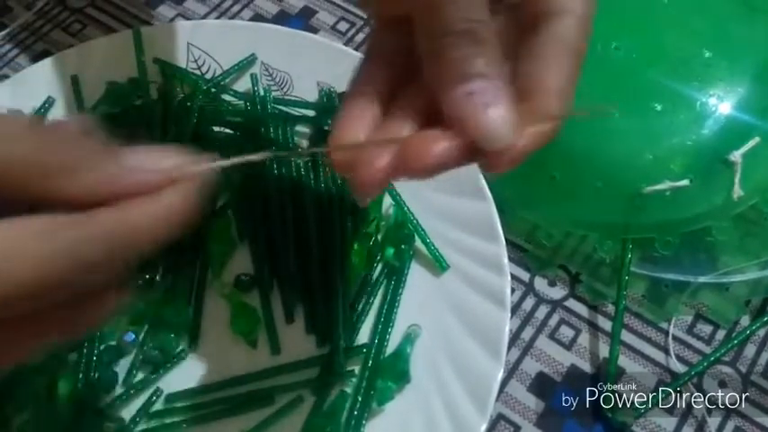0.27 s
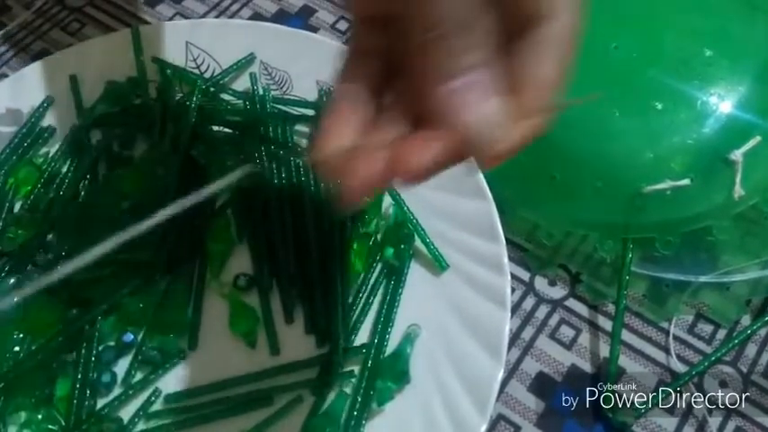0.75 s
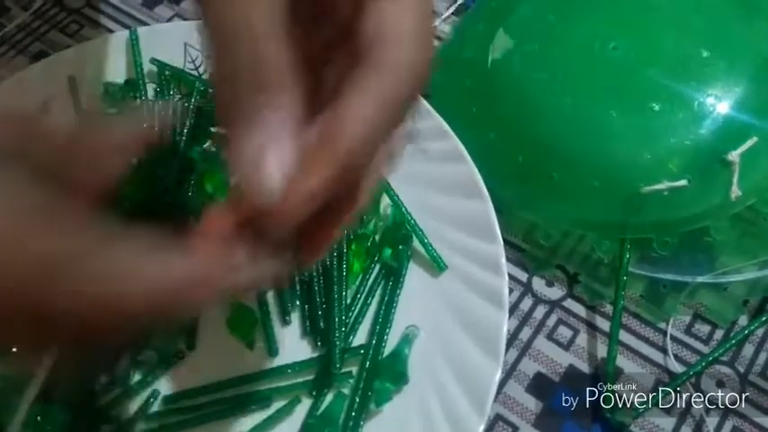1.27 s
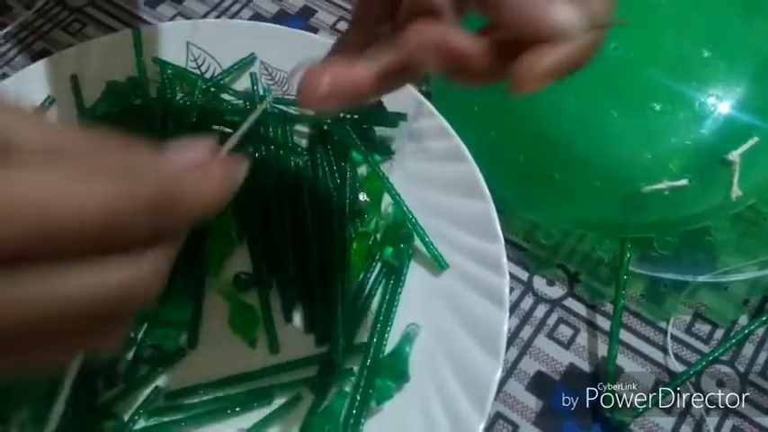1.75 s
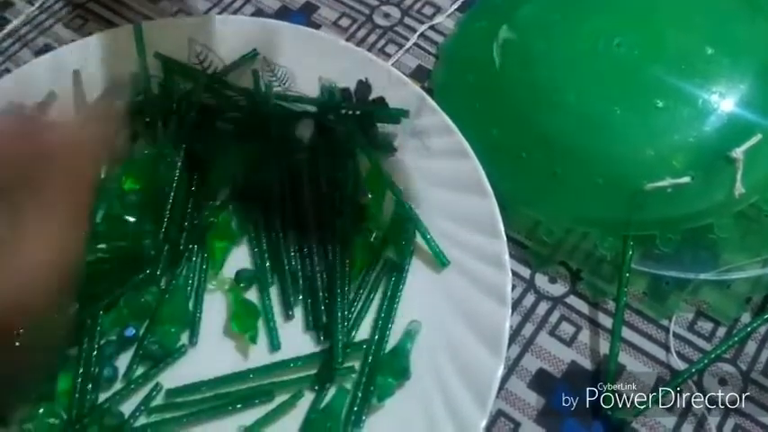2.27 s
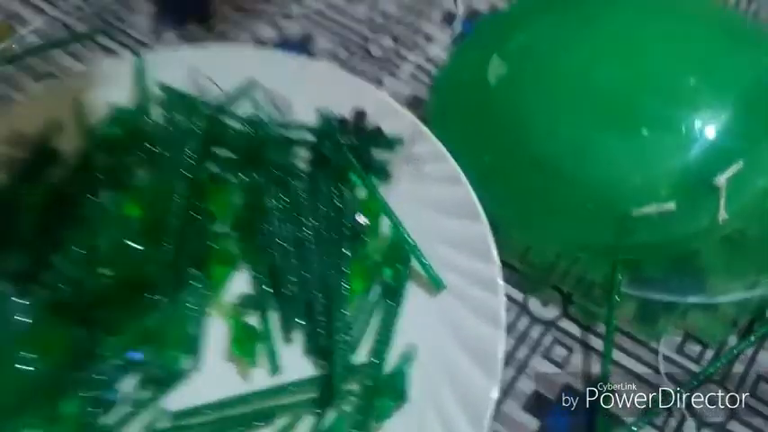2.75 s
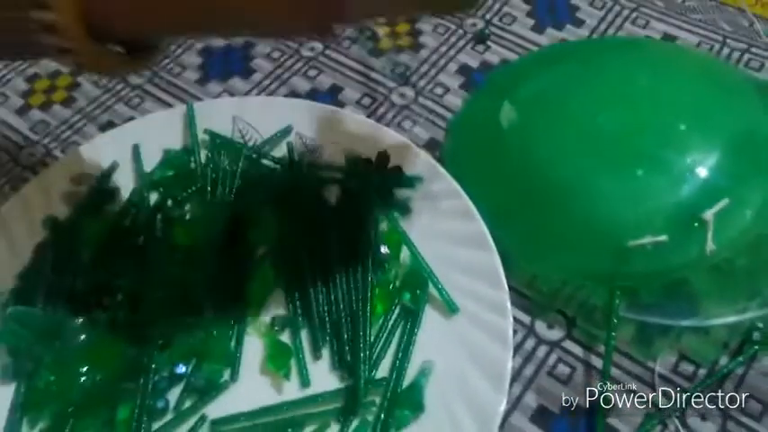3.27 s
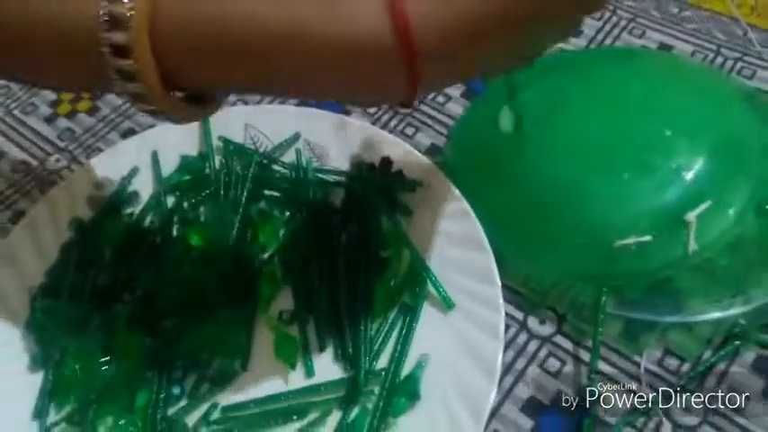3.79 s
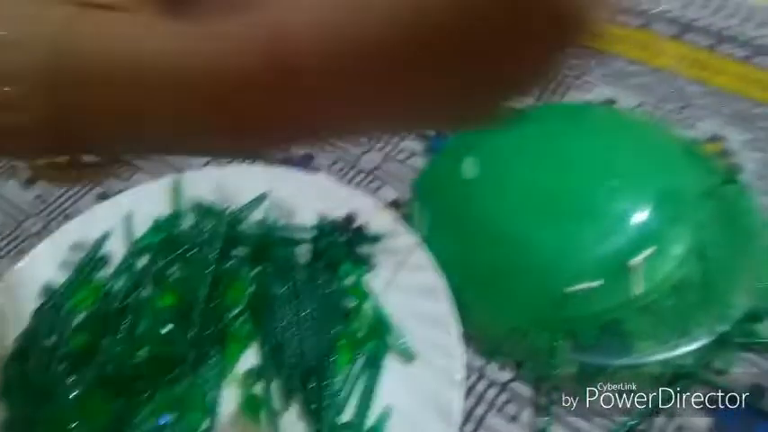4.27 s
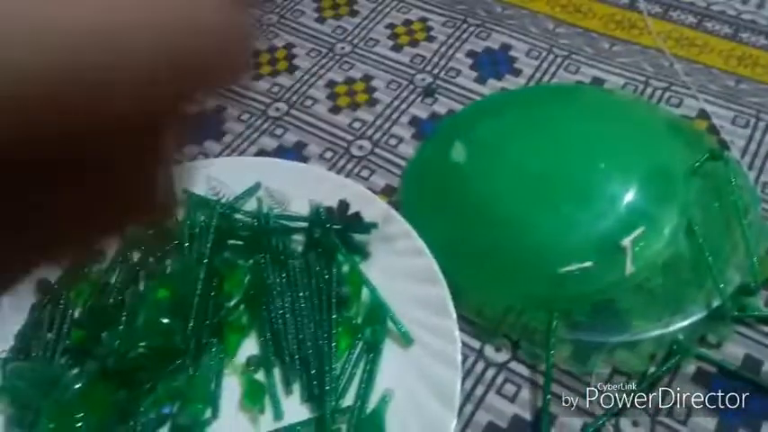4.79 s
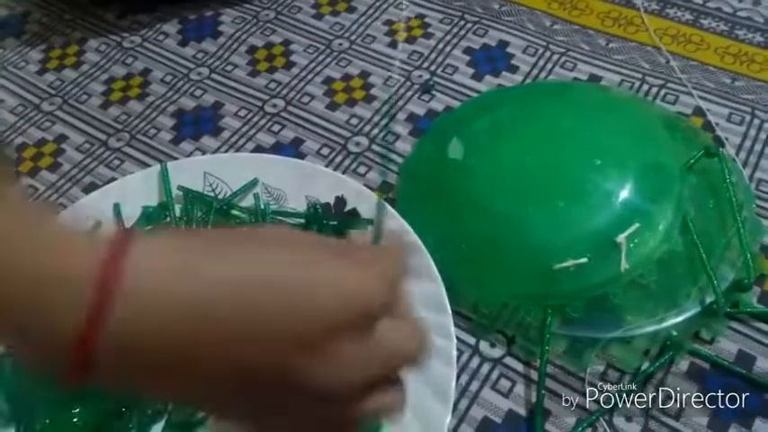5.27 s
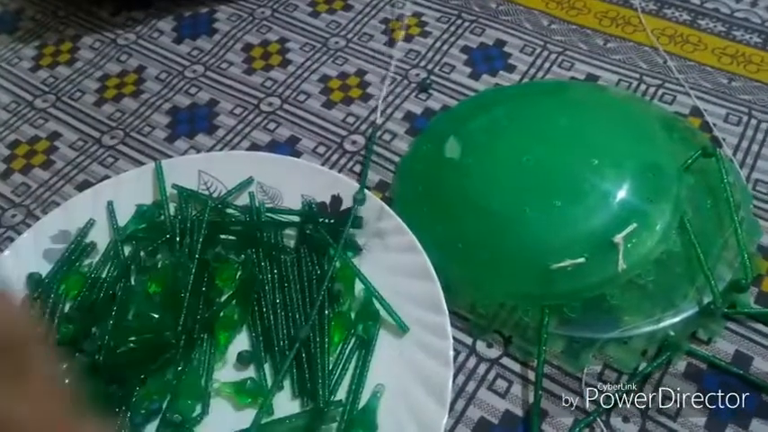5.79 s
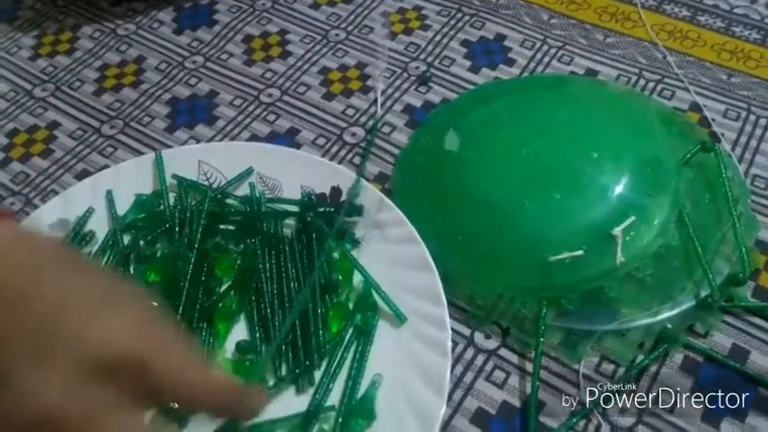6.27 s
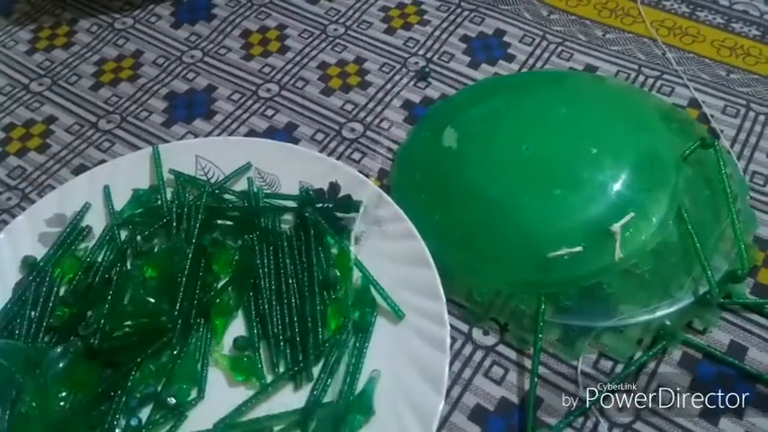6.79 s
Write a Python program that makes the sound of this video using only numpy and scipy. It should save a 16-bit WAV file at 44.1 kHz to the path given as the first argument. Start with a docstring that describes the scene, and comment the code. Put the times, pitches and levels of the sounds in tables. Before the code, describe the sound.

Short hard plastic tubes and beads click in the fingers, then rattle in bursts as a hand stirs a heap on a plate.

```python
"""Short hard plastic pipes and beads are threaded and sorted in a heap on a plate, close to a phone.
Single pieces click: each contact is shaped noise plus ringing pipe modes. The stirred heap rattles: pushes
set off random trains of such contacts. Heap and rattle excite plate resonances; slides, bumps and one faint
hiss are noise in resonance. A small room answers by convolution, over a wavering rush of air and low rumble."""
import sys
import numpy as np
from scipy import signal
from scipy.fft import rfft
from scipy.io import wavfile
from scipy.ndimage import uniform_filter1d

SR = 44100
rng = np.random.default_rng(int(sys.argv[2]) if len(sys.argv) > 2 else 0)


def bounce(signal):
    """Save signal as a 16-bit WAV file at the path given by the first command-line argument."""
    frames = np.transpose(np.atleast_2d(signal))
    limited = np.clip(frames, -1, 1)
    pcm = np.round(limited * 32767).astype(np.int16)
    wavfile.write(sys.argv[1], SR, pcm)


N = 310464  # samples


def amp(db):
    """Logarithmic levels: decibels become a pressure gain."""
    return 10 ** (np.asarray(db) / 20)


def evened(x):
    """Normalization: scales the signal to an rms of 1."""
    return x / np.sqrt(np.mean(x ** 2) + 1e-20)


def read(table, hz):
    """Spectral interpolation: every column of a table at hz, on a log-frequency axis."""
    f, *columns = np.transpose(table)
    return np.array([np.interp(np.log(hz + 1), np.log(f), column) for column in columns])


def follow(curve):
    """Amplitude envelope: a level curve as a gain for every sample."""
    return amp(np.interp(np.arange(N) / SR, *np.transpose(curve)))


def causal(db):
    """Minimum phase: the Hilbert transform of log gain gives the phase of an impulse response."""
    log_gain = np.log(amp(np.concatenate([db, db[:, -2:0:-1]], axis=1)))
    return np.fft.ifft(np.exp(np.conj(signal.hilbert(log_gain)))).real


def convolve(x, response):
    """Linear filtering: convolves each channel and keeps the length."""
    return signal.fftconvolve(x, response, axes=1)[:, :x.shape[1]]


def panned(pan_db):
    """Interchannel level difference: left and right gains, positive towards the left."""
    return amp([[pan_db / 2], [-pan_db / 2]])


def add(mix, s, sound):
    """Superposition: mixes a stereo sound in at s seconds."""
    part = mix[:, round(s * SR):][:, :sound.shape[1]]
    part += sound[:, :part.shape[1]]


def correlated(first, second, likeness):
    """Interchannel coherence: two independent noises become a pair of the given correlation."""
    same = np.clip(likeness, -1, 1)
    return np.array([first, same * first + np.sqrt(1 - same ** 2) * second])


def noise(spectrum_db, likeness, patchy_db, size=1024):
    """Short-time spectral shaping: partly coherent stereo noise that wavers in time-frequency patches."""
    frames = 4 * N // size + 5
    t = np.arange(frames)[:, None] * size / 4 / SR
    a, b, c, d, patches = rng.standard_normal((5, frames, size // 2 + 1))
    patches = uniform_filter1d(patches, size=12, axis=0)
    patches = evened(uniform_filter1d(patches, size=5, axis=1))
    pair = correlated(a + 1j * b, c + 1j * d, likeness)
    hz = np.fft.rfftfreq(size, 1 / SR)[None]
    pair *= amp(spectrum_db(hz, t) + patchy_db * np.tanh(patches))
    _, sound = signal.istft(pair, nperseg=size, noverlap=size * 3 // 4, time_axis=1, freq_axis=2)
    return evened(sound[:, :N])


# Relative spectrum of the room air. Each row: frequency in Hz, left level in dB, right level in dB.
AIR_SPECTRUM = [(30, -43.5, -35), (70, -23.5, -14.5), (141, -20, -12), (243, -0.5, 10.5), (331, -10.5, -2),
                (410, -18, -11), (680, -7.5, -5.5), (917, -8, -5.5), (1086, -15.5, -13), (1320, -11, -5),
                (1575, -17.5, -9.5), (2010, -23, -21), (3016, -29, -14), (3120, -45.5, -36),
                (5200, -45, -27.5), (12200, -54.5, -68)]
# Colour change of the air as the phone moves. Each row: frequency in Hz, change in dB.
AIR_COLOUR_SHIFT = [(140, -2.5), (450, 0.5), (660, 6.5), (860, -12), (1070, -3), (1300, 8.5), (1600, -11),
                    (1900, 1.5)]
MOVED_S = 3.14  # when the phone starts to move, s


def air_colour(hz, t, hum_hz=220, hum_width_hz=130, hum_fade_db_per_s=0.17):
    """Time-varying spectrum: a low hum fades slowly, and the middle turns hollow as the phone moves."""
    moved = np.clip(t - MOVED_S, 0, 1)
    hum = np.exp(-((hz - hum_hz) / hum_width_hz) ** 2)
    return read(AIR_SPECTRUM, hz) + moved * read(AIR_COLOUR_SHIFT, hz) - hum_fade_db_per_s * t * hum


# Strength of the air before its overall gain. Each row: time in seconds, relative level in dB.
AIR_STRENGTH = [(0.0, -56.5), (2.25, -58), (3.9, -59), (4.5, -57.5), (5.3, -59.5), (7.04, -62)]


def room_air(level_db=6):
    """Broadband noise: the rush of air follows a level curve and wavers in patches."""
    air = noise(air_colour, likeness=0.59, patchy_db=6.0)
    return amp(level_db) * follow(AIR_STRENGTH) * air


# Strength of the phone shifting in the hand. Each row: time in seconds, relative level in dB.
HANDLING_STRENGTH = [(0.0, -72), (0.25, -53), (0.39, -75), (2.59, -73.5), (3.08, -50.5), (3.9, -79),
                     (6.55, -79), (6.59, -65.5), (7.04, -85)]
# Relative colour of the handling rumble. Each row: frequency in Hz, level in dB.
RUMBLE_SPECTRUM = [(40, -27.5), (80, 4.5), (130, -5.5), (300, -24), (2000, -100)]


def handling_rumble(level_db=-1, pan_db=10):
    """Low-frequency noise: the shifting phone rumbles, mostly at the left microphone."""
    rumble = noise(lambda hz, t: read(RUMBLE_SPECTRUM, hz), likeness=0.5, patchy_db=0)
    return amp(level_db) * follow(HANDLING_STRENGTH) * rumble * panned(pan_db)


# Reverberation of the room. Each row: frequency in Hz, 60 dB decay time in seconds.
ROOM_DECAY = [(3000, .43), (7000, .38), (15000, .21)]


def room(x, tail_db=-15, near_db=-14, near_t60=0.06, onset=0.0027):
    """Reverberation: sparse early scatter and a frequency-dependent exponential tail of random echoes."""
    taps = rng.standard_normal((2, SR * 2 // 3))
    age = np.arange(taps.shape[1]) / SR
    arrived = np.clip(age / onset - .5, 0, 1)
    hz, t, z = signal.stft(taps, SR, nperseg=256)
    decay = amp(-60 * t / read(ROOM_DECAY, hz).T)
    tail = signal.istft(z * decay, SR)[1][:, :len(age)] * arrived
    # cubed noise leaves a few strong echoes among many weak ones
    near = rng.standard_normal(taps.shape) ** 3 * amp(-60 * age / near_t60) * arrived
    response = amp(tail_db) * evened(tail) + amp(near_db) * evened(near)
    return convolve(x, response / np.sqrt(len(age)))


def resonant_strokes(table, likeness, grain_db):
    """Resonant noise: each grainy stroke swells and fades in one resonance, filtered twice."""
    out = np.zeros((2, N))
    for s, length, db, hz, width, pan_db in table:
        a, b, grip = rng.standard_normal((3, 2 * SR))[:, :round(length * SR)]
        grain = amp(grain_db * evened(uniform_filter1d(grip, size=90)))
        stroke = correlated(a, b, likeness) * grain
        resonance = signal.iirpeak(hz, hz / width, fs=SR)
        stroke = signal.lfilter(*resonance, signal.lfilter(*resonance, stroke))
        swell = np.sin(np.linspace(0, np.pi, len(a)))
        add(out, s, amp(db) * panned(pan_db) * evened(stroke * swell))
    return out


# Soft bumps of the hands and the phone. Each row: start in seconds, length in seconds, level in dB,
# centre in Hz, width of one filter pass in Hz, left-right difference in dB.
SOFT_BUMPS = [(.19, 0.077, -56.5, 128, 149, 16), (.62, 0.26, -56, 203, 96, -1),
              (.9, 0.079, -50.5, 180, 61.3, 0), (1.64, .14, -54, 183, 71, -5),
              (2.44, 0.14, -54, 205, 47.8, -5), (3.0, 0.088, -48.5, 108.7, 118, 11),
              (3.13, 0.21, -58.5, 95, 80, 12)]


def bumps():
    """Low resonance: soft handling bumps are brief, partly coherent strokes of noise."""
    return resonant_strokes(SOFT_BUMPS, likeness=0.75, grain_db=1.5)


# Fingers, thread and pipes sliding over each other, except the row at 2.45 s: a long treble hiss,
# too faint to hear. Each row: start in seconds, length in seconds, level in dB,
# centre in Hz, width of one filter pass in Hz, left-right difference in dB.
SLIDES_AND_HISS = [(.185, 0.16, -55.5, 1000, 930, -6), (.84, 0.036, -44, 15000, 1600, 0),
                   (1.3765, 0.0048, -40.5, 9140, 1800, 10), (2.45, 1.43, -81, 13200, 2410, 0.5),
                   (4.1, 0.18, -55.5, 6100, 640, -12.5), (4.09, .19, -70.5, 12300, 3500, -5.5),
                   (4.7, .35, -72, 8500, 2600, 12.5)]


def slides_and_hiss():
    """Band-limited noise: friction of sliding pieces, and one faint treble hiss, as grainy strokes."""
    return resonant_strokes(SLIDES_AND_HISS, likeness=.27, grain_db=4)


# Resonances of the loaded plate. Each row: frequency in Hz, relative level in dB.
PLATE_MODES = [(2560, 5.5), (3580, -1), (5506, -2.5), (6428, 0), (6690, -9), (7080, -7), (7476, -0.5),
               (8958, -8.5)]


def plate(x, ring_db=-2, width_hz=70):
    """Modal resonance: the knocks that reach the plate excite its narrow resonances in parallel."""
    out = np.zeros_like(x)
    for hz, db in PLATE_MODES:
        resonance = signal.iirpeak(hz, hz / width_hz, fs=SR)
        out += amp(db) * signal.lfilter(*resonance, x + 1e-20)
    return amp(ring_db) * out


# Colour of hard plastic at the two microphones. Each row: frequency in Hz, left level in dB,
# right level in dB; each contact then adds its own tilt.
PLASTIC_COLOUR = [(388, -41.5, -40), (921, -24.5, -33.5), (1440, -15.5, -13.5), (2430, -16.5, -12.5),
                  (2760, -21, -12), (3340, -12, -4), (4470, -11, -3.5), (5170, -10, 0.5), (7120, -1, -5),
                  (9250, -3.5, -18), (10770, -14.5, -16.5), (13700, -17, -20), (15900, -40.5, -47)]


def contact_colour(hz, body_db, bright_db, knock_db, mid_db):
    """Source spectrum: material colour plus the tilt of one contact at two microphones, in dB."""
    tilt = [(90, -25), (500, -3), (1000, body_db - 2), (1500, body_db + knock_db - 2),
            (2600, body_db), (4200, mid_db), (7500, 0), (11500, bright_db)]
    return read(PLASTIC_COLOUR, hz) + read(tilt, hz)


# Modes of a pipe of middle length, before the spread in length. Each row: frequency in Hz,
# relative level in dB, 60 dB decay time in seconds.
PIPE_MODES = [(2570, 0, .017), (2980, 2, .016), (4130, 2, .016), (5450, 1, .016), (6783, -3, .016),
              (8600, 3, .012)]


def piece(body_db, bright_db, ring_ms, pipe_db, length_spread, knock_db, mid_db, ripple_db,
          rise_share=0.17, size=1024):
    """Impact excitation: one contact of unit energy, a pipe ringing as it chatters on its neighbours."""
    t, hz = np.arange(size) / SR, np.fft.rfftfreq(size, 1 / SR)
    ring = max(ring_ms, .3) / 1000  # s
    # the blow takes a moment to spread through the pieces that touch
    rise = 1 - np.exp(-t / (rise_share * ring))
    chatter = rng.standard_normal((2, size)) * rise * np.exp(-.3 * (t / ring) ** 1.18)
    # a hard contact excites all broad bands alike and leaves only narrow peaks
    band_power = uniform_filter1d(abs(rfft(chatter)) ** 2, size=24)
    chatter = convolve(chatter, causal(-10 * np.log10(band_power)))
    pitch = np.exp(length_spread * rng.standard_normal())  # pipes differ in length
    modes = 0
    for f, db, t60 in PIPE_MODES:
        phase = rng.random() + rng.random((2, 1)) / 2  # cycles
        modes = modes + amp(db - 60 * t / t60) * np.sin(2 * np.pi * (f * pitch * t + phase))
    strike = evened(chatter) + amp(pipe_db) * evened(modes * rise)
    # each point of contact favours its own frequencies
    ripple = uniform_filter1d(uniform_filter1d(rng.standard_normal(len(hz)), size=6), size=6)
    colour = contact_colour(hz, body_db, bright_db, knock_db, mid_db) + ripple_db * evened(ripple)
    sound = convolve(strike, causal(colour))
    return sound / np.sqrt(np.sum(sound ** 2) / 2)


HELD_RING_DB, HEAP_RING_DB = 5, -9  # pipe ring against chatter, dB
HEAP_RIPPLE_DB = 4  # how much contacts in the heap differ in spectrum, dB
# Single clicks. Each row: start in seconds, level over 5 ms in dB before the group's gain, body in dB,
# brightness in dB, ring time scale in ms (at least 0.3 is used), left-right difference in dB.
SINGLE_CLICKS = [(0.5092, -40, 9, 12, 0.61, -10), (0.528, -28.5, 12.5, -4, 1.1, -2),
                 (0.64, -42, 4, -2, 10, -1), (0.782, -37.5, 11, 21, 5.1, 0), (0.8435, -36, 4, 3, 1.6, 1),
                 (0.852, -37, 4, 16, 4.2, 0), (0.921, -39, 1, 13, 4.8, -5),
                 (1.0385, -55.5, -13.5, 5, 2, -13), (1.299, -60.5, -11, 7.5, 2.5, -9),
                 (1.379, -35.5, 14, 9, 0.67, 2), (1.841, -22, 9, -2, 2.1, -5),
                 (1.878, -25.5, 2, 12.5, 2.2, -7), (1.896, -41, 11.5, -4, 1.1, -8),
                 (2.1957, -20, 7, -1, 0.97, -14.5), (2.33, -40.5, -3, 6, 1.1, -13),
                 (2.412, -41.5, -4, 6, 0.76, -11), (2.467, -39, -3, -4, 1.2, -13.5),
                 (3.5313, -31.5, 7, 2, 2.4, -4.5), (3.617, -35.5, 7, -9, 0.35, -12),
                 (3.6314, -25.5, 7, -16, 0.87, -3.5), (3.638, -26.5, 7, 5, 2, -9),
                 (3.7106, -38, 2.5, -5, 3.1, -9), (3.822, -40.5, 6, -11, 2.1, -4),
                 (3.9521, -22.5, 1, -4, 1.1, -3), (3.974, -20.5, 6, -10, 1.4, -2.5),
                 (3.9836, -24.5, 9, 4, 1.8, -8), (4.0398, -30.5, 13, -5, 1.6, 0),
                 (4.0594, -23, 11.5, 1.5, 3, -1), (4.2588, -24, 20.5, -1, 1.5, 2.5),
                 (4.2669, -26.5, -28.5, 2, 3.6, -9), (4.297, -35.5, 12.5, -1.5, 3, -6),
                 (4.31, -32, 3, -6, 2.4, -3), (4.392, -28.5, 5, 2.5, 1.8, 5.5),
                 (4.4063, -13, 5, -9.5, 1.9, 13.5), (4.6476, -19, 14.5, 2, 0.61, -1),
                 (4.896, -48, -5.5, 10.5, 0.9, 6), (5.0984, -25.5, -0.5, 8, 1.7, -6.5),
                 (5.121, -23, -1, 9, 3.6, -2), (5.1464, -21, -9, 7, 2.6, 2),
                 (5.1777, -21.5, 7.5, -6, 1.1, -3), (5.19, -30.5, 4.5, -17, 1.3, -2),
                 (5.2048, -29, 7, -13, 0.34, -5), (5.2144, -36, 9, -9, 1.5, -16),
                 (5.2887, -36.5, 8, 14, 1.6, 8), (5.325, -16.5, -11, 3, 0.86, 1),
                 (5.4591, -29.5, 8.5, 2.5, 2.8, -1.5), (5.509, -34, -8, -5, 1.6, -10.5),
                 (5.56, -42.5, 5.5, 3, 0.97, -2), (5.949, -17.5, -4.5, -8, 1.4, -3),
                 (6.186, -23, -2.5, 4, 4.9, -2), (6.3746, -41.5, 0, 6, 0.93, 4), (6.68, -22, 7, 2, 2, -11),
                 (6.7002, -8, 2, 2.5, 1.2, -2.5), (6.776, -29, 5.5, -8, 1.5, -9),
                 (6.809, -21.5, 11, -1, 1.2, -10.5), (6.8312, -29.5, -6, 12, 1.6, -4),
                 (6.8542, -18, 3, 0, 1.7, 3), (6.8837, -22.5, 0.5, 1, 1.6, 2)]
HELD_UNTIL = 3  # s; single clicks are in the hand before this and in the heap after
IN_HAND = [row for row in SINGLE_CLICKS if row[0] < HELD_UNTIL]
IN_HEAP = [row for row in SINGLE_CLICKS if row[0] >= HELD_UNTIL]


def all_round(rows, knock_db=-6, mid_db=2, size=2048):
    """Diffuse radiation: the walls hear clicks from all sides, so directional peaks and dips even out."""
    out, hz = np.zeros((2, N)), np.fft.rfftfreq(size, 1 / SR)
    for s, db, body_db, bright_db, _, _ in rows:
        sound = causal(contact_colour(hz, body_db, bright_db, knock_db, mid_db))
        add(out, s, amp(db) * np.sqrt(SR / 200 / size) * evened(sound))
    return out


def clicks(rows, **contact):
    """Direct sound: the single impacts that stand out, each a fresh contact."""
    out = np.zeros((2, N))
    window = SR / 200  # samples in 5 ms
    for s, db, body_db, bright_db, ring_ms, pan_db in rows:
        sound = piece(body_db, bright_db, ring_ms, **contact)
        add(out, s, amp(db) * np.sqrt(window) * panned(pan_db) * sound)
    return out


def held_clicks():
    """Free vibration: a held pipe rings freely; picked pipes are of nearly one length."""
    return amp(-4.5) * clicks(IN_HAND, pipe_db=HELD_RING_DB, length_spread=0.008,
                              knock_db=0.0, mid_db=-1, ripple_db=1.5)


def heap_clicks():
    """Damped vibration: a pipe in the heap rings less and knocks on the plate."""
    return amp(-6) * clicks(IN_HEAP, pipe_db=HEAP_RING_DB, length_spread=0.11,
                            knock_db=2.0, mid_db=-3.5, ripple_db=HEAP_RIPPLE_DB)


def push(t, attack, length, sag_db_per_s=25.5, settle_db_per_s=638):
    """Force envelope: a push rises, weakens while it lasts, then the heap settles."""
    fade_db = sag_db_per_s * np.minimum(t, length) + settle_db_per_s * np.maximum(t - length, 0)
    return np.minimum(t / attack, 1) ** 2 * amp(-fade_db)


KNOCKS_PER_S, GLANCING_DB = 660, 5.5  # knock rate; scale of the random weakening of glancing knocks
VARIETY_DB = 3.5  # spread of body and brightness between pieces
TOPPLES_PER_S, TOPPLE_DB, TOPPLE_FADE_DB_PER_S = 60, 5, 170  # after a push: rate, size, weakening
# Pushes of the fingers that set many pieces rattling. Each row: start in seconds, attack in seconds,
# length before settling in seconds, relative level in dB, brightness in dB, left-right difference in dB.
FINGER_PUSHES = [(0.484, 0.0092, 0.045, -42.5, 2, -8.5), (0.774, 0.0054, 0.048, -41, 7, -4),
                 (0.838, 0.0024, 0.024, -35.5, 3, -3), (1.047, 0.083, 0.05, -47, 13, -9),
                 (2.139, .004, 0.051, -52.5, -8, -7), (2.32, 0.019, 0.22, -52, -2, -11),
                 (3.531, .006, 0.3, -48.5, -4, -7), (3.607, 0.0059, 0.054, -44, -4, -12),
                 (3.96, 0.012, 0.028, -31, 6, -9), (4.042, 0.0092, 0.026, -29, 2, -7),
                 (4.105, 0.013, 0.13, -44, -1, -4), (4.369, 0.032, 0.033, -12, 2.5, -3),
                 (4.638, 0.0043, 0.02, -39.5, -3, -16), (5.083, 0.013, 0.064, -34, -2, -3),
                 (5.135, 0.0045, 0.046, -25.5, 6.5, -5), (5.282, 0.015, 0.11, -37, 10, -4.5),
                 (5.309, 0.019, 0.047, -20.5, 4.5, -4), (5.381, 0.0077, 0.037, -29.5, 5.5, -4),
                 (5.433, 0.007, 0.017, -38.5, -4, -10), (5.922, 0.044, 0.071, -21.5, 6, -1),
                 (5.995, 0.0065, 0.062, -28, 2, -3.5), (6.09, 0.0056, 0.073, -37.5, 1.5, -2),
                 (6.195, 0.011, 0.038, -33.5, 1, -1.5), (6.662, 0.013, 0.038, -30.5, -1, -2),
                 (6.823, 0.0044, 0.069, -30.5, 1.5, -7)]


def rattle(level_db=-4, body_db=3, count=6):
    """Random impact trains: pushes make a handful of pieces knock, and a few topple afterwards."""
    out, t = np.zeros((2, N)), np.arange(SR // 4) / SR
    for s, attack, length, db, bright_db, pan_db in FINGER_PUSHES:
        glancing = np.minimum(rng.exponential(1, len(t)), 3)
        knocks = (rng.random(len(t)) < KNOCKS_PER_S / SR) * amp(-GLANCING_DB * glancing)
        # the push is shared among the pieces that move at that moment
        crowding = np.sqrt(np.abs(uniform_filter1d(knocks ** 2, size=500)) + 0.0027)
        knocks = knocks / crowding * push(t, attack, length)
        topples = (rng.random(len(t)) < TOPPLES_PER_S / SR) * (t > length)
        knocks = knocks + topples * amp(TOPPLE_DB - TOPPLE_FADE_DB_PER_S * (t - length))
        which = rng.integers(0, count, len(t))
        for k, (a, b) in enumerate(rng.standard_normal((count, 2))):
            sound = piece(body_db + VARIETY_DB * a, bright_db + VARIETY_DB * b, ring_ms=1.0,
                          pipe_db=HEAP_RING_DB, length_spread=0.1774,
                          knock_db=-0.5, mid_db=-4.0, ripple_db=HEAP_RIPPLE_DB)
            train = (knocks * (which == k))[None]
            add(out, s, amp(db) * panned(pan_db) * convolve(train, sound))
    return amp(level_db) * out


def scene():
    """Superposition: direct clicks and rattle, plate ring, slides and bumps, room answer and background."""
    held, heap, stirred = held_clicks(), heap_clicks(), rattle()
    clatter = stirred + plate(heap + stirred) + slides_and_hiss()
    walls = room(clatter + amp(-0.5) * all_round(IN_HEAP, knock_db=4.0, mid_db=0.0))
    # the hand is further from the floor
    walls += room(all_round(IN_HAND), tail_db=-14, near_db=-14.5, onset=0.0034)
    background = room_air() + handling_rumble()
    return held + heap + clatter + walls + bumps() + background


def record(dry):
    """Saturation and band limiting: tanh rounds off the hardest peaks, then a low-pass cuts the top."""
    lowpass = signal.firwin(511, 15900, window=("kaiser", 9), fs=SR)  # cutoff in Hz
    return signal.oaconvolve(np.tanh(dry), lowpass[None], "same")


dry = scene()
out = record(dry)
bounce(out)
```